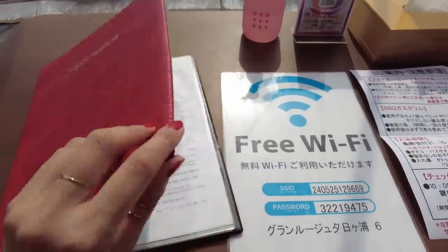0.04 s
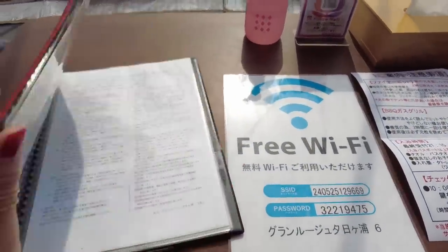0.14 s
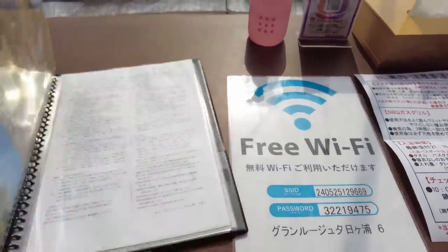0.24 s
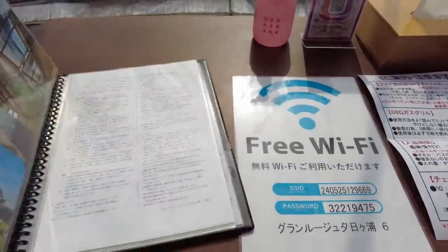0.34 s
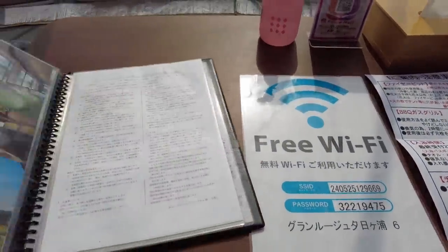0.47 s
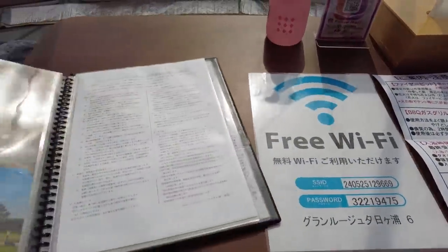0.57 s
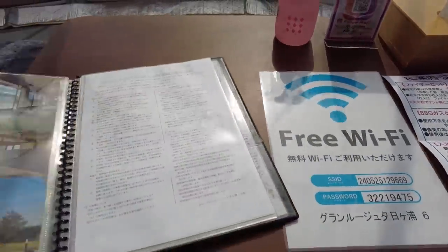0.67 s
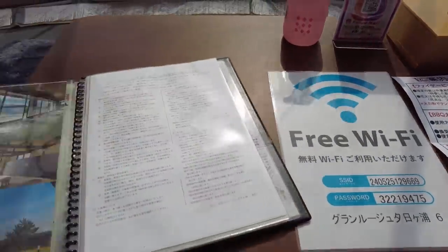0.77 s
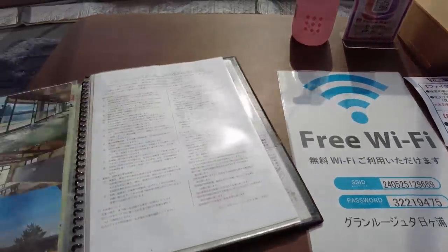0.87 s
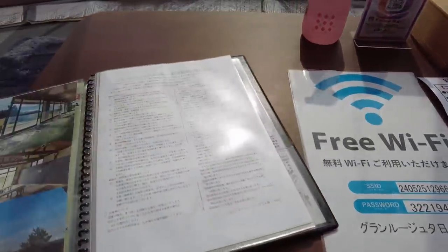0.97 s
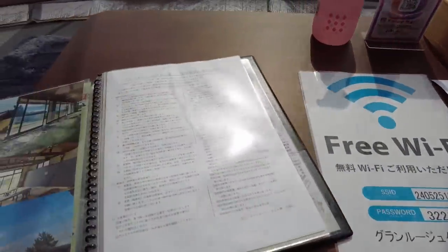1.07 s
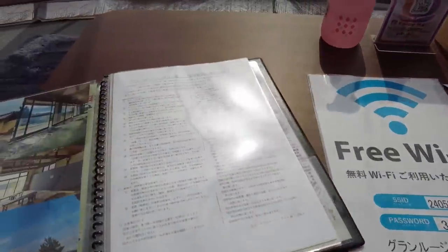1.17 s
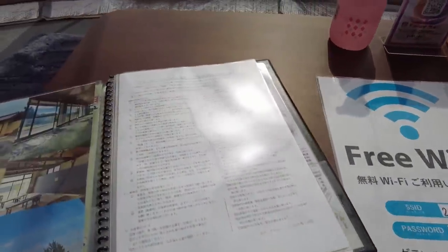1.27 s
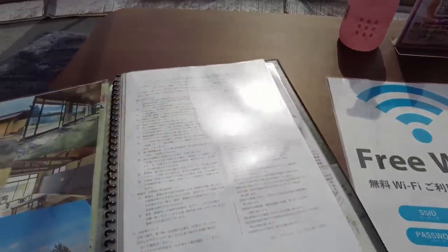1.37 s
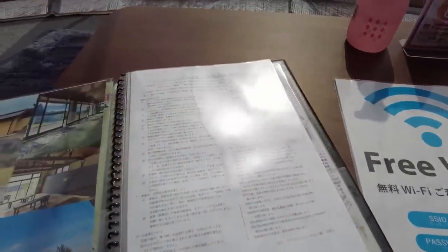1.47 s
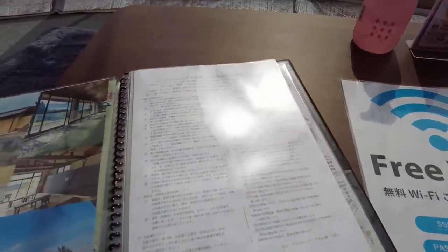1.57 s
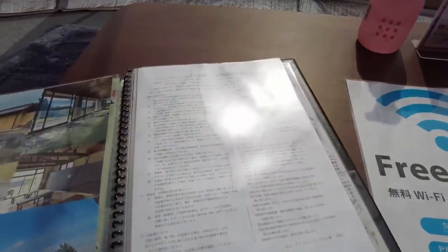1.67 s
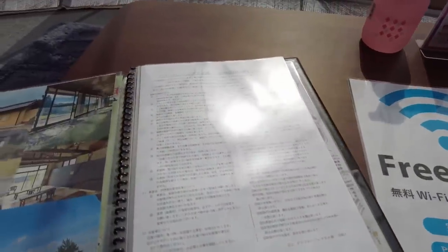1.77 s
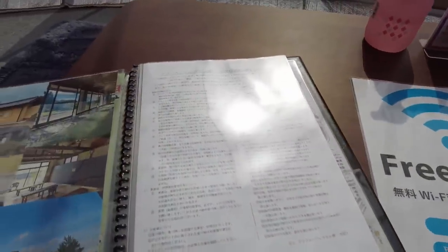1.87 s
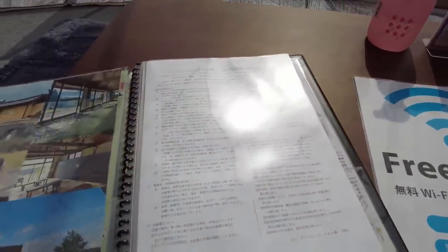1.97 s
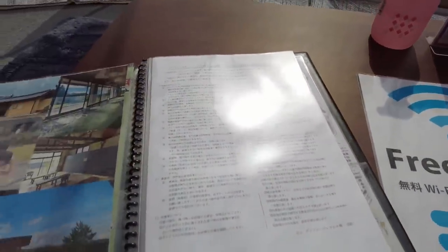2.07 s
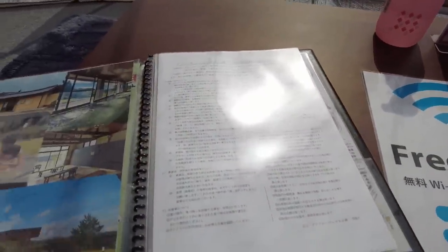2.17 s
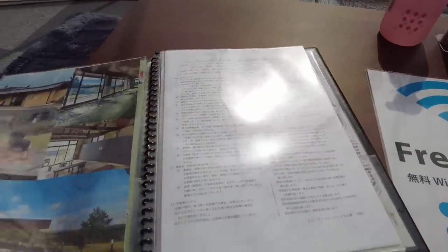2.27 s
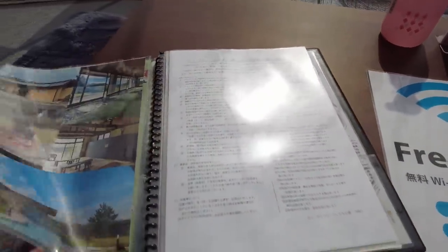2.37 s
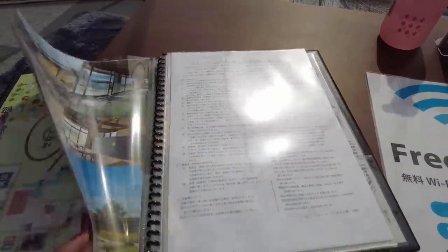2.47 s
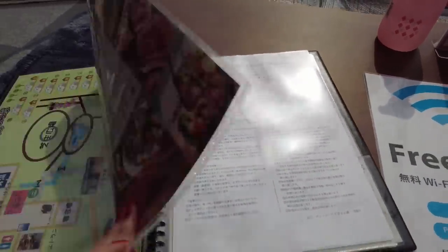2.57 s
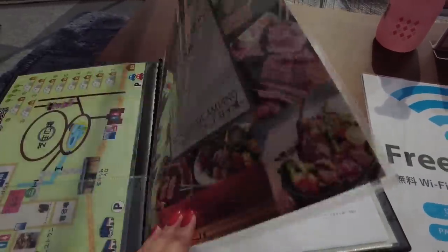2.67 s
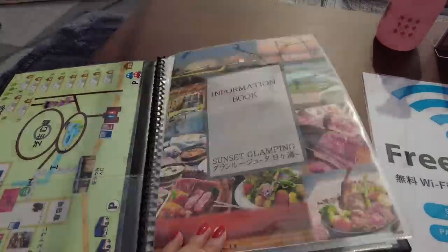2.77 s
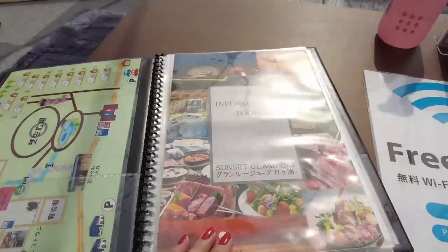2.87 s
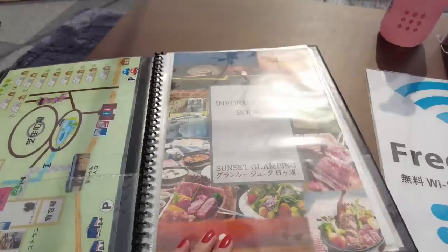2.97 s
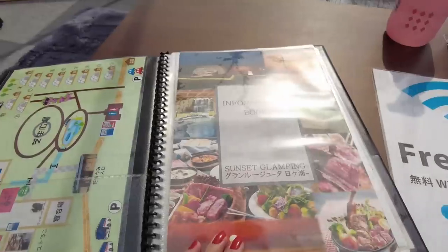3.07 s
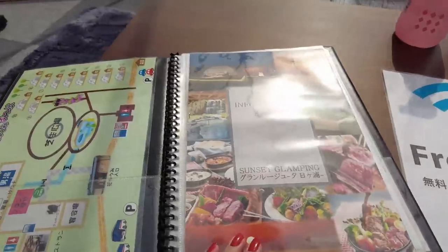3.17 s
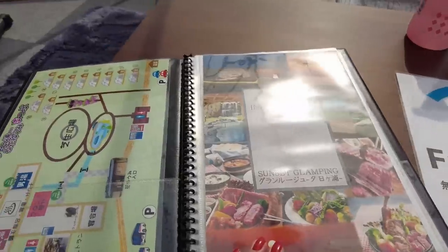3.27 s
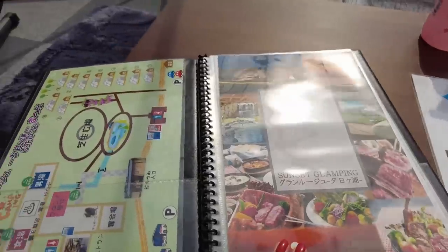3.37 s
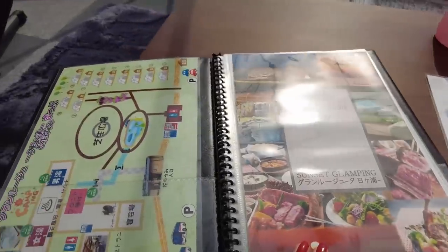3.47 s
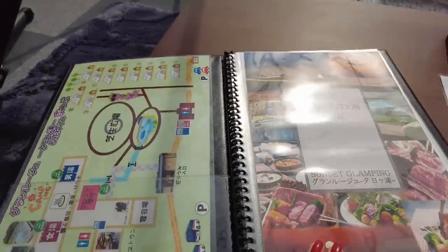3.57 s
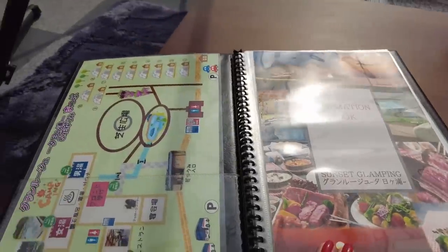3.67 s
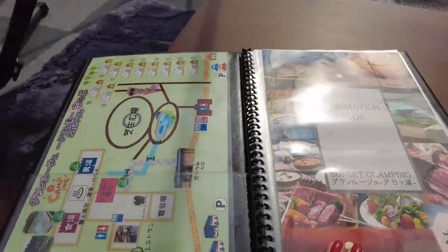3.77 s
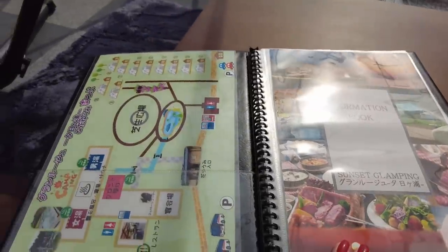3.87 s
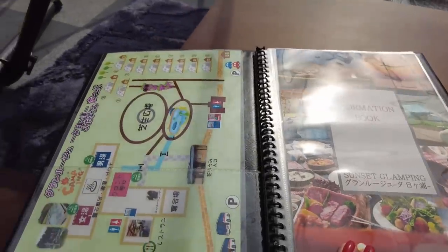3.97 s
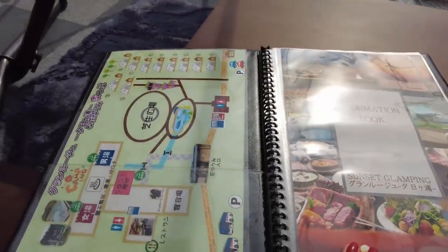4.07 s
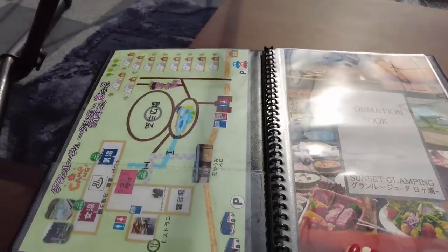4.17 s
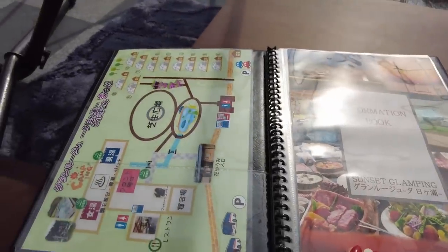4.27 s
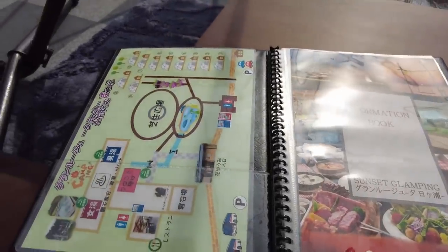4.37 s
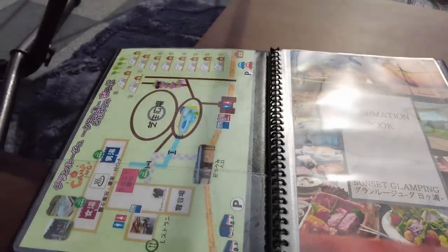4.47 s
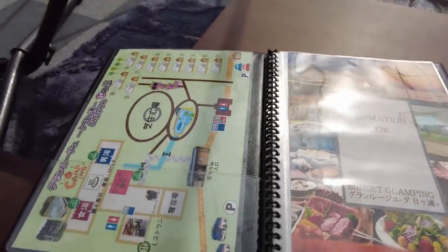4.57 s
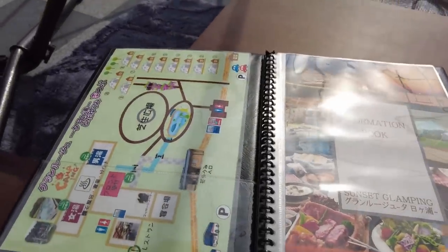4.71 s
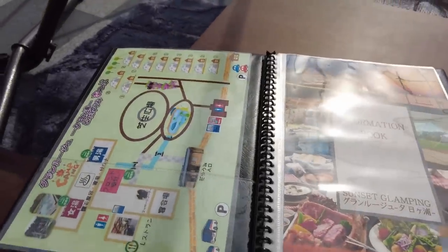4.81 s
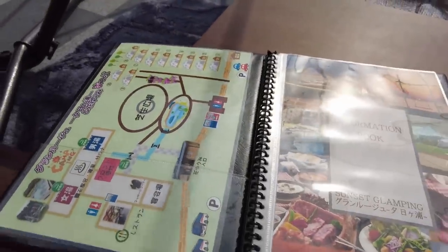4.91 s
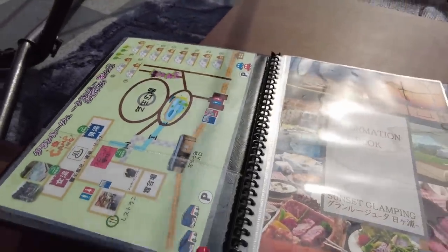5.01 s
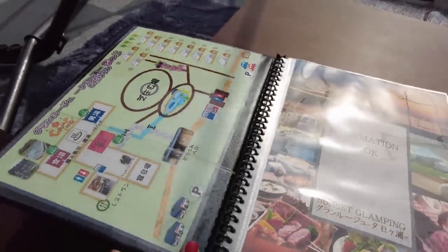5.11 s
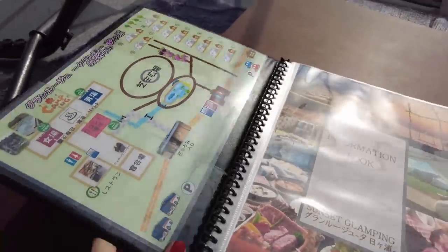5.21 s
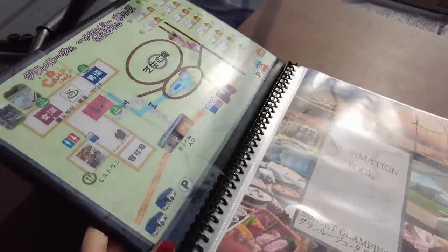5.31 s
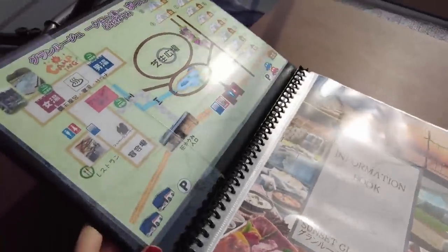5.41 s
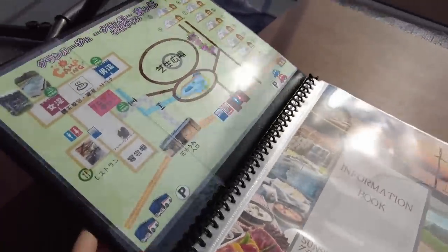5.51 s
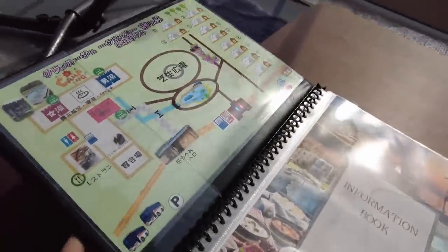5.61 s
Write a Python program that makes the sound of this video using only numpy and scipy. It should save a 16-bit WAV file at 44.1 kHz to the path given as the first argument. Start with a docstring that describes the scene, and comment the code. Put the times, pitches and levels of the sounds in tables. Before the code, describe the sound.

Steady low ventilation rumble with soft hiss indoors. A binder cover swings open with a soft whump, plastic sleeves crackle and rub, and pages tap the table. A quiet stretch leads to one brisk, bright page turn, the loudest moment, with creaking rings. Sparse handling clicks and bumps come next, and a gentle sliding scrape ends it, heard close in stereo.

```python
"""Ventilation rumbles and hisses throughout: continuous noise, partly shared by two ports, its hiss sinking
by several dB near the end. Then a binder of plastic sleeves is opened on a table close to a hand-held phone:
sleeves rub (grainy noise) and snap (short resonances with a wall echo), and the cover pushes air (slow swings).
Leafing goes on with thuds on the table (damped sines with a knock) and creaks on the rings (noise through
resonances). At the end the binder slides over the table top (scraping noise)."""
import sys
import numpy as np
from scipy import signal
from scipy.fft import rfft, irfft, next_fast_len
from scipy.io import wavfile
from scipy.ndimage import uniform_filter1d, map_coordinates

SR = 44100
rng = np.random.default_rng(int(sys.argv[2]) if len(sys.argv) > 2 else 0)


def store_wav(level_fs):
    """Save 16-bit WAV to argv[1]."""
    pcm = np.round(np.clip(np.atleast_2d(level_fs), -1, 1) * 32767)
    wavfile.write(sys.argv[1], SR, pcm.T.astype(np.int16))


N = 249165

# Ventilation hiss: (time [s], level [dB])
HISS_LEVEL = [(0.0, -53.5), (1.27, -56.5), (2.03, -54.5), (3.0, -54.5), (5.29, -55.5), (5.43, -59.5),
              (5.65, -61)]
# Spectral shapes of duct rumble and hiss: (frequency [Hz], relative density [dB per Hz])
RUMBLE_SPECTRUM = [(8, -36), (15, -6), (27, 9.5), (41, 9), (52, -2), (62, 0.5), (72, -22.5), (110, -54)]
HISS_SPECTRUM = [(40, -17), (80, 3), (130, -6.5), (250, -9), (450, -13.5), (600, -18.5), (1000, -16),
                 (1350, -17.5), (2000, -26), (4000, -33.5), (8000, -39.5), (16000, -56)]
RUMBLE_DB = -43.5

# Likeness of the two ports in noise: (frequency [Hz], left-right correlation [-1 to 1])
PORT_LIKENESS = [(20, 0.98), (60, 0.97), (170, 0.97), (350, 0.61), (520, 0.27), (700, 0), (1000, -0.67),
                 (1400, 0.7), (2400, 0.18), (5000, 0.32), (15000, 0.014)]
# Sensitivity of the ports: (frequency [Hz], left minus right [dB])
PORT_BALANCE = [(30, -5), (110, -4), (400, -2), (1000, -1), (2400, -2), (8000, -1), (15000, 0)]
# Spectral shape of the microphones' own hiss: (frequency [Hz], relative density [dB per Hz])
SELF_NOISE_SPECTRUM = [(1000, -26), (3000, 26), (7000, 11), (11000, -49), (14000, -28), (16000, -11)]
SELF_NOISE_DB, TOP_HZ = -86.0, 15900  # hiss level before the port balance; upper band limit

# Slowly swelling and fading rubbing of sleeve on sleeve: (time [s], level [dB])
RUB_LEVEL = [(.14, -68.5), (.3, -64), (.44, -65.5), (.5, -60), (.58, -55), (.64, -65), (.69, -50.5),
             (.75, -55.5), (.81, -60.5), (.87, -73), (1.1, -79), (2.25, -80)]
# Short strokes of sleeve on sleeve: (time of peak [s], level [dB], treble re level [dB], fall to 1/e [s])
STROKES = [(.253, -65, -13, 0.047), (.52, -42, -1, 0.0062), (.994, -59.5, -19, 0.025),
           (1.388, -62, -8, 0.02), (2.036, -57, -1, 0.017), (2.1, -57, -6, 0.04), (2.353, -62.5, -5, 0.18),
           (2.551, -32, -9, 0.011), (2.587, -42.5, -10, 0.018), (2.637, -36.5, -32, 0.012),
           (2.689, -50, -9, .008), (2.745, -53.5, -5.5, 0.043), (2.92, -59.5, -8, 0.08),
           (2.979, -56.5, -19, 0.016), (3.281, -70, -19, 0.024), (3.664, -62, -9, 0.017),
           (3.771, -49, -13, 0.0081), (3.805, -49.5, -9, 0.0074), (4.152, -55.5, -3.5, 0.0074),
           (4.29, -68.5, -9, 0.079), (4.468, -54, -5, 0.028), (4.745, -65.5, -4, 0.034)]
# Spectral shapes of friction and of its treble fizz: (frequency [Hz], relative density [dB per Hz])
FRICTION_SPECTRUM = [(300, 6.5), (700, -1), (1400, -2.5), (3200, 2), (6000, -5.5), (8000, -6), (12000, -36)]
FIZZ_SPECTRUM = [(4500, -30), (8000, -4), (10000, 0), (15000, 0), (17000, -3)]
FIZZ_DB, RISE_SHARE = -6, 0.59  # fizz re slow rubbing; rise of a stroke over its fall

# Sleeve snaps: (time [s], peak short-term level [dB], buckle pitch [Hz], treble crack re level [dB],
# wall echo re level before scattering and absorption [dB]: loud when the sleeve faces the wall)
SLEEVE_SNAPS = [(0.1631, -53, 2180, -17, -18), (0.2469, -40, 2760, 9.5, -10), (0.2856, -53, 1500, -25, -10),
                (0.449, -49.5, 2800, -5, -14), (0.4857, -41.5, 3180, 4, -17.5), (0.4995, -54, 2700, 4, -14),
                (0.5116, -47.5, 3140, 7, 15.5), (0.5159, -34, 2600, -17, -25), (0.5337, -59, 4500, 16, -12),
                (0.5669, -41, 3020, -4, -5.5), (0.694, -47, 2900, -28, -12), (0.7052, -39, 2100, -26, -16),
                (0.7818, -49, 1700, -21, -8), (0.8806, -31, 3770, -4.5, -13.5),
                (0.93, -41, 2980, 0.5, -3.5), (0.9606, -53, 2500, -21, -16), (0.988, -41.5, 2220, -23, -14),
                (1.213, -53.5, 2600, -18, -14), (1.3847, -50.5, 2450, -1, -2),
                (1.8499, -52, 1900, -4.5, -3), (2.0835, -39.5, 2060, -8, 5), (2.0892, -27, 2060, -48, -3),
                (2.1024, -39, 3100, -10, -16), (2.143, -49, 3900, -19, -12), (2.3567, -37.5, 3700, -6, -11),
                (2.429, -44.5, 4530, -15, -5), (2.4529, -29, 4300, -3, -7), (2.5476, -15, 3570, -6, 2),
                (2.5585, -26, 4930, 5, -6), (2.6281, -30, 4120, -11, -10), (2.6307, -38.5, 3400, 4, -6),
                (2.6356, -30, 3500, -14, 1), (2.6809, -46, 3300, -9, 11), (2.724, -47, 2680, 1, -15),
                (2.7484, -43, 2900, -10, -6), (2.772, -43, 1900, -35, -6), (2.7816, -34, 1410, -60, -11),
                (2.7972, -44.5, 1400, -37, -16), (2.839, -46.5, 1990, -28, -6),
                (2.8482, -38, 2620, 1.5, -19), (2.8601, -41.5, 1740, -20, -28),
                (4.152, -46.5, 2900, -4, -3), (4.444, -51, 5000, -6, -3), (4.456, -46.5, 1400, -22, -14),
                (4.4628, -32.5, 4500, 5, -25), (4.4802, -51, 4000, -8, -14), (4.7395, -48.5, 3360, -20, -5),
                (4.7791, -54, 1800, -16, -2), (4.8618, -53, 2100, -15, -4), (4.8813, -29.5, 1980, -22, -12),
                (5.0415, -34, 5800, -21, -18), (5.601, -57.5, 3000, -2, 1)]
# Dips in the colour of a snap, two fixed notches: (frequency [Hz], width [Hz], depth [dB])
SNAP_DIPS = [(3450, 1100, -13), (8300, 1100, -12)]
# Where the handled sleeve is, left to right: (time [s], lag of the left port [us])
SLEEVE_PLACE = [(0.2, -38), (0.9, -93), (2.1, -84), (2.5, -29), (2.8, -15), (4.2, 48), (4.8, 46), (5.0, 17)]
ECHO_S, ECHO_LAG_US = 0.0065, 40  # round trip to the wall; lag of the left port
LAG_WEAKENS = 0.045  # dB between the ports per us of lag

# Decay of the room: (frequency [Hz], time to fall 60 dB [s])
ROOM_T60 = [(200, 0.52), (2000, 0.091), (12000, 0.091)]
ROOM_DB = -15

# Thuds of cover, pages and fingers on the table: (time [s], peak of the swing [dB], pitch [Hz])
TABLE_THUDS = [(0.242, -46.5, 347), (0.415, -46.5, 247), (0.512, -45, 300), (0.777, -47.5, 237),
               (0.861, -44.5, 164), (0.983, -53, 500), (1.033, -44, 474), (1.846, -40.5, 201),
               (2.028, -36.5, 138), (2.085, -36, 412), (2.447, -46, 185), (2.538, -33.5, 765),
               (2.546, -28, 808), (2.631, -36, 205), (2.775, -38, 308), (3.629, -47.5, 232),
               (4.775, -42.5, 207), (4.877, -36, 214), (4.931, -44, 222), (5.024, -47.5, 202),
               (5.156, -49, 243), (5.425, -44.5, 616)]
THUD_T60_S, THUD_REF_HZ, THUD_DAMPING = 0.054, 205, 0.81  # decay at the reference pitch; higher dies sooner
KNOCK_DB, KNOCK_REF_DB = -6.5, -46.5  # knock re swing, at this thud level
KNOCK_GROWS, KNOCK_WIDTH = 0.23, 0.94  # dB per dB of a harder thud; opposed part over shared part

# Creaks of sleeves dragging on the rings: (time [s], peak of the envelope [dB], four times the rise [s])
RING_CREAKS = [(0.276, -51.5, 0.031), (0.974, -54.5, .04), (1.027, -59, 0.04), (2.583, -45, 0.029),
               (2.631, -41.5, .03), (2.734, -50, .025), (2.771, -49, 0.048), (3.267, -58.5, 0.062),
               (3.654, -56.5, 0.04), (3.765, -43, 0.032), (3.803, -48, 0.023), (4.25, -60, 0.076),
               (4.437, -49, 0.047)]
# Resonances of the spine, and of ring against sleeve: (frequency [Hz], width [Hz], relative level [dB])
SPINE_MODES = [(500, 150, -2.5), (940, 34, 11.5), (1134, 54, 10.5), (1400, 200, 6.5)]
SQUEAK_MODES = [(2610, 64, -3)]
HARD_DRAG_DB, SQUEAK_GROWS = -46.5, 2.9  # creak level where both drives are equal; dB gained per dB above it

# Binder sliding on the table: (time [s], level [dB], treble re level [dB])
SLIDE_LEVEL = [(4.8, -75, -6), (4.86, -66, -4), (4.92, -58.5, -3), (5.05, -53.5, 1), (5.19, -52, 2),
               (5.33, -54.5, 1.5), (5.43, -55, -3.5), (5.49, -68, 3), (5.57, -78, 0.5)]
# Spectral shape of the scrape: (frequency [Hz], relative density [dB per Hz])
SCRAPE_SPECTRUM = [(400, -14), (700, -5), (1000, -3), (2200, -6), (6000, -8.5), (8000, -9.5), (12000, -29)]

LEFT_RIGHT = np.array([[1], [-1]])


def amp(db):
    """Level definition: decibels to an amplitude ratio."""
    return 10 ** (np.asarray(db) / 20)


def unit(x):
    """Normalization: scales a signal to an rms of 1."""
    return x / np.sqrt(np.mean(x ** 2) + 1e-20)


def along(points, hz):
    """Logarithmic interpolation: (frequency, value) points read on a log axis."""
    f, v = np.transpose(points)
    return np.interp(np.log(hz + 1), np.log(f + 1), v)


def curves(rows):
    """Linear interpolation: one curve per column after the time; the first fades out beyond the ends."""
    s, level, *cols = np.transpose(rows)
    t = np.arange(N) / SR
    outside = np.maximum(s[0] - t, 0) + np.maximum(t - s[-1], 0)
    faded = np.interp(t, s, level) - 1000 * outside  # 1000 dB per second
    return [faded] + [np.interp(t, s, c) for c in cols]


def wobble(rate):
    """Slow random modulation: a smooth curve through random knots, rate of them a second."""
    knots = rng.standard_normal(int(N * rate / SR) + 4)
    return map_coordinates(knots, [np.arange(N) * rate / SR])


def filtered(x, response):
    """Linear filtering: the spectrum of x times a complex response of frequency."""
    m = next_fast_len(x.shape[-1] + 8192)
    spectrum = rfft(x, m) * response(np.fft.rfftfreq(m, 1 / SR))
    return irfft(spectrum, m)[..., :x.shape[-1]]


def resonance(f, centre, width):
    """Damped resonance: complex response of one mode, 1 at its centre."""
    return 1j * f * width / (centre ** 2 - f ** 2 + 1j * f * width)


def rush(spectrum, grain_db=0):
    """Partial coherence: stereo noise of rms 1, partly shared; grain_db breaks it into tiny slips."""
    pair = rng.standard_normal((2, N)) * amp(grain_db * wobble(820))

    def shares(hz):
        turn = np.arccos(np.clip(along(PORT_LIKENESS, hz), -1, 1)) / 2
        return amp(along(spectrum, hz)) * [np.cos(turn), np.sin(turn)]

    mid, side = filtered(pair, shares)
    return unit(np.array([mid + side, mid - side]))


def add(out, sound, s, lag_us):
    """Path difference: the farther port hears the placed sound later and a little weaker."""
    half = LEFT_RIGHT / 2
    margin = 16  # samples of room for the lag to move either way
    padded = np.pad(sound, (margin, margin))
    pair = filtered(padded, lambda hz: np.exp(-2j * np.pi * hz * half * lag_us * 1e-6))
    start = max(round(s * SR) - margin, 0)
    out[:, start:start + pair.shape[1]] += pair * amp(-half * (LAG_WEAKENS * lag_us))


def ventilation():
    """Broadband flow noise: a low duct rumble and a soft, gently wavering hiss."""
    waver = amp(0.8 * wobble(8))
    hiss = amp(curves(HISS_LEVEL)[0]) * waver * rush(HISS_SPECTRUM)
    return amp(RUMBLE_DB) * rush(RUMBLE_SPECTRUM) + hiss


def rubbing():
    """Dry friction: grainy noise of sleeve on sleeve, with a treble fizz where the plastic peels."""
    t = np.arange(N) / SR
    slow_db, = curves(RUB_LEVEL)
    level, fizz = amp(slow_db), amp(slow_db + FIZZ_DB)
    for s, db, treble_db, fall in STROKES:
        stroke = amp(db) * np.exp(-np.abs(t - s) / np.where(t < s, RISE_SHARE * fall, fall))
        level = np.hypot(level, stroke)  # independent noises add in power
        fizz = np.hypot(fizz, amp(treble_db) * stroke)
    flutter = amp(1.5 * wobble(60) + 1.5 * wobble(25))
    friction = level * rush(FRICTION_SPECTRUM, grain_db=-2.5)
    return flutter * (friction + fizz * rush(FIZZ_SPECTRUM, grain_db=1.5))


def snap_colour(f):
    """Notch filtering: fixed dips in the colour of a snap."""
    dips = [(c * c - f * f + 1j * f * w * amp(db)) / (c * c - f * f + 1j * f * w)
            for c, w, db in SNAP_DIPS]
    return np.prod(dips, axis=0)


def snaps():
    """Buckling instability: a few rough cycles at pitch, a bright crack, a short fizz, then a wall echo."""
    out, t = np.zeros((2, N + SR)), np.arange(SR // 25) / SR

    def scaled(x, db):  # sets the loudest short stretch to the level
        return amp(db) * x / np.sqrt(uniform_filter1d(x * x, size=30).max())

    for s, db, hz, crack_db, echo_db in SLEEVE_SNAPS:
        body_noise, crack_noise, wall_noise = rng.standard_normal((3, len(t)))
        edge = hz * max(3.5 + crack_db / 22, 1.3)  # a soft buckle carries little above its pitch

        def ring(f):
            lowpass = edge ** 2 / (edge ** 2 - f * f + 1.2j * f * edge)
            return resonance(f, hz, 1.4 * hz) * lowpass ** 2

        kick = (t == 0) * 4 + body_noise * (amp(-60 * t / 0.0037) + amp(-3.5 - 60 * t / 0.011))
        body = scaled(filtered(kick, lambda f: ring(f) * snap_colour(f)), db)
        tear = (t == t[8]) * 2.4 + crack_noise * (amp(-60 * t / 0.0031) + amp(-27 - 60 * t / 0.025))
        crack = scaled(filtered(tear, lambda f: snap_colour(f) * f ** 4 / (f ** 4 + 7500 ** 4)), db)
        add(out, body + amp(crack_db) * crack, s, np.interp(s, *np.transpose(SLEEVE_PLACE)))

        scatter = (t == 0) * 2.3 + wall_noise * amp(-60 * t / 0.0055)  # the wall is uneven
        scatter /= np.linalg.norm(scatter)
        dull = filtered(body, lambda f: 1 / (1 + 1j * f / 4000))  # and soft: it swallows part of the treble
        echo = np.convolve(dull + amp(crack_db - 3.0) * crack, scatter)[:len(t)]
        add(out, amp(echo_db) * echo, s + ECHO_S, ECHO_LAG_US)
    return out[:, :N]


def room(x):
    """Reverberation: a short soft tail of decaying noise, duller as it dies."""
    noise = rng.standard_normal((2, SR // 3))
    hz, t, z = signal.stft(noise, SR, nperseg=256)
    t60 = along(ROOM_T60, hz)[:, None]
    tail = signal.istft(z * amp(-60 * t / t60), SR, nperseg=256)[1]
    delayed = np.pad(x, ((0, 0), (400, 0)))  # samples before the tail begins
    return signal.fftconvolve(delayed, tail / np.linalg.norm(tail[0]), axes=1)[:, :N]


def cover():
    """Air displacement: the swinging cover pushes a few slow swings; its hinge bumps as it starts."""
    t = np.arange(N) / SR - 0.18
    u = np.clip(t / 0.027, 0, None)
    cycles = 44 * t + 0.22 * (1 - np.exp(-u))
    push = amp(-31.5) * u * np.exp(1 - u) * np.sin(2 * np.pi * cycles)
    bump = amp(-36) * np.exp(-((t - 0.012) / 0.0078) ** 2) * np.sin(2 * np.pi * 115 * t)
    return push + bump


def thuds():
    """Damped free vibration: a low swing of table and pages, and the dull knock of the contact."""
    out, t = np.zeros((2, N + SR)), np.arange(SR // 5) / SR
    onset = 1 - np.exp(-(t / 0.00304) ** 2)  # a soft contact starts gradually
    for s, db, hz in TABLE_THUDS:
        t60 = THUD_T60_S * (THUD_REF_HZ / hz) ** THUD_DAMPING
        swing = np.sin(2 * np.pi * hz * t) * amp(-60 * t / t60) * onset
        noise = rng.standard_normal((2, len(t))) * onset * amp(-60 * t / 0.068)
        mid, side = filtered(noise, lambda f: resonance(f, 600, 800) ** 2)
        knock = mid + KNOCK_WIDTH * LEFT_RIGHT * side  # wide: the whole table top sounds
        knock_db = KNOCK_DB + KNOCK_GROWS * (db - KNOCK_REF_DB)
        thud = swing / abs(swing).max() + amp(knock_db) * knock / abs(mid).max()
        out[:, round(s * SR):][:, :len(t)] += amp(db) * thud
    return out[:, :N]


def creaks():
    """Stick-slip: quick uneven slips excite spine resonances, and a higher squeak when the drag is hard."""
    slips = np.zeros((2, N))  # drives of the spine and of the squeak
    for s, db, length in RING_CREAKS:
        u = np.arange(round(4 * length * SR)) / (length * SR)
        squeak_db = SQUEAK_GROWS * (db - HARD_DRAG_DB)
        envelope = 4 * u * np.exp(1 - 4 * u)
        slips[:, round(s * SR):][:, :len(u)] += amp([[db], [db + squeak_db]]) * envelope

    def modes(rows):  # neighbours alternate in sign
        return lambda f: sum((-1) ** k * amp(db) * resonance(f, c, w) for k, (c, w, db) in enumerate(rows))

    noise = rng.standard_normal(N) * amp(3 * wobble(700))
    scale = np.sqrt(np.mean(filtered(noise, modes(SPINE_MODES)) ** 2))
    creak = filtered(slips[0] * noise, modes(SPINE_MODES))
    squeak = filtered(slips[1] * noise, modes(SQUEAK_MODES))
    return (creak + squeak) / scale * amp(-0.5 * LEFT_RIGHT)


def slide():
    """Sliding friction: the cover scrapes over the table, nearer the right port, its treble varying."""
    db, treble_db = curves(SLIDE_LEVEL)
    waver = amp(0.5 * wobble(16))
    treble = amp(treble_db) * rush(FIZZ_SPECTRUM, grain_db=1) * amp(-2 * LEFT_RIGHT)
    scrape = rush(SCRAPE_SPECTRUM) + treble
    return waver * amp(db) * scrape * amp(-LEFT_RIGHT)


def scene():
    """Superposition: all sources add; the room answers the snaps, thuds and creaks."""
    hits = snaps() + thuds() + creaks()
    return ventilation() + rubbing() + hits + amp(ROOM_DB) * room(hits) + cover() + slide()


def record(dry):
    """Transduction: the microphones add their hiss and differ in level; then the band limit."""
    noisy = dry + amp(SELF_NOISE_DB) * rush(SELF_NOISE_SPECTRUM)
    return filtered(noisy, lambda f: amp(LEFT_RIGHT / 2 * along(PORT_BALANCE, f)) * (f < TOP_HZ))


dry = scene()
out = record(dry)
store_wav(out)
```